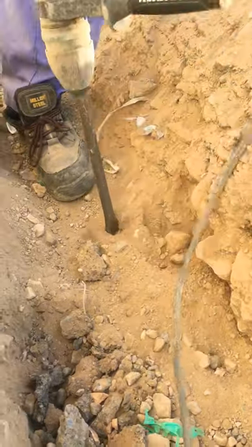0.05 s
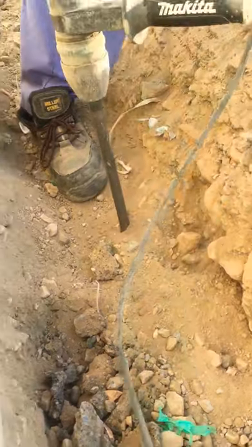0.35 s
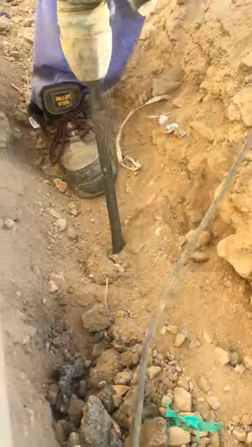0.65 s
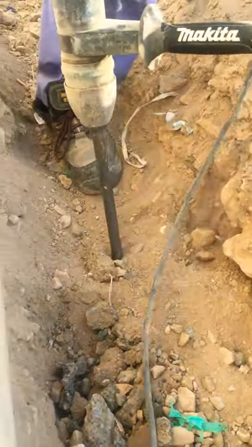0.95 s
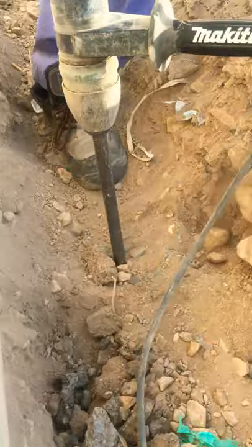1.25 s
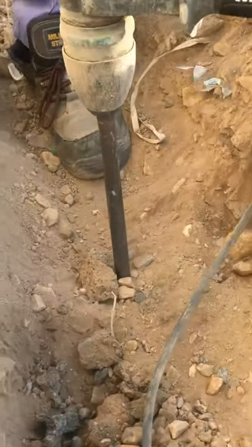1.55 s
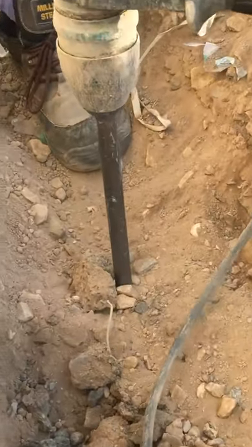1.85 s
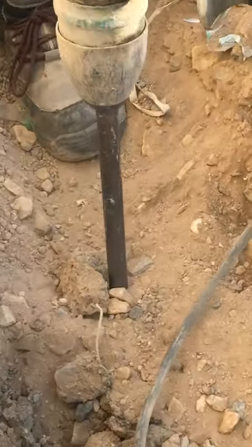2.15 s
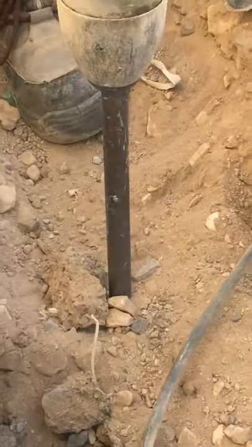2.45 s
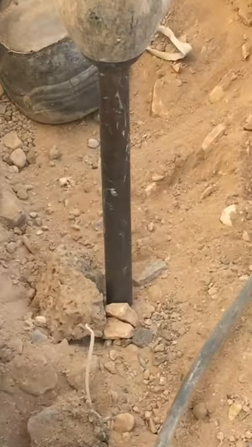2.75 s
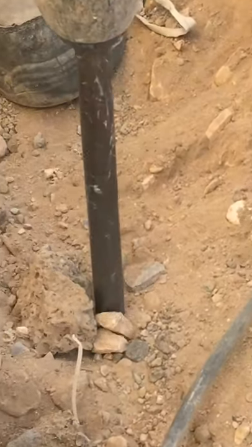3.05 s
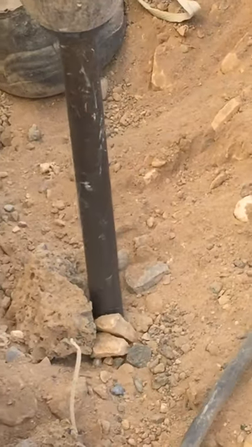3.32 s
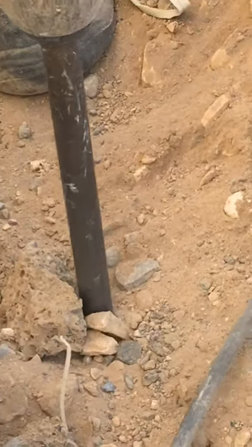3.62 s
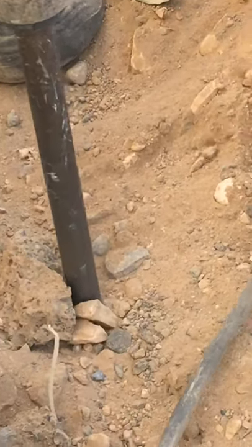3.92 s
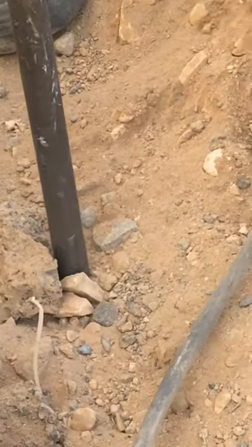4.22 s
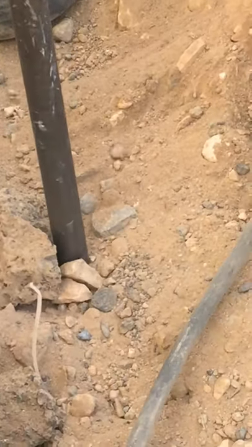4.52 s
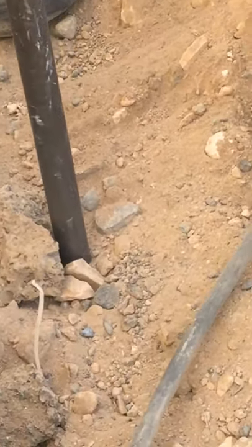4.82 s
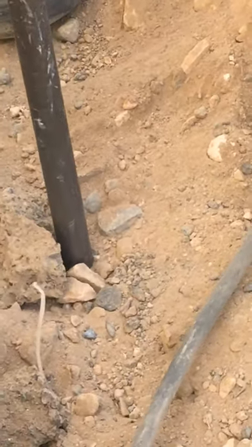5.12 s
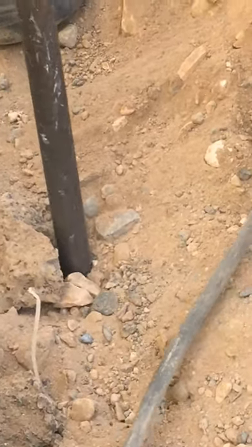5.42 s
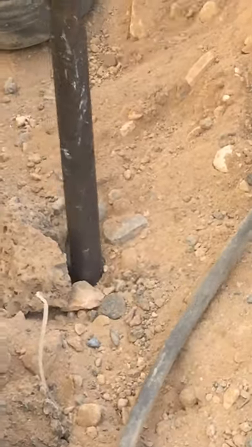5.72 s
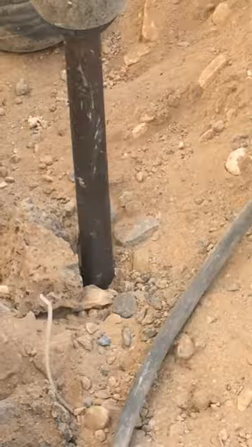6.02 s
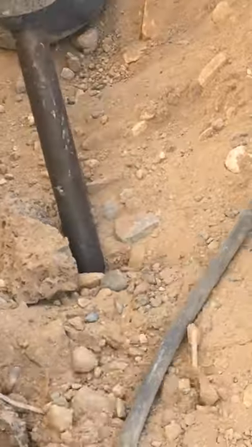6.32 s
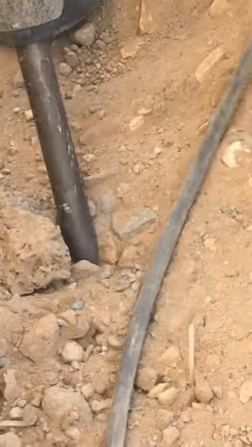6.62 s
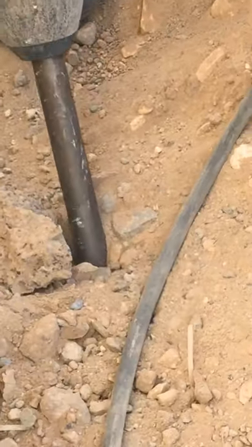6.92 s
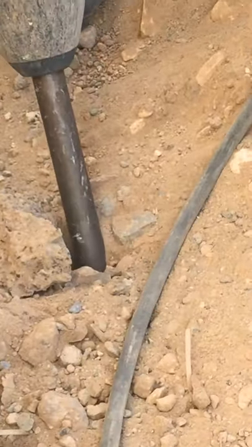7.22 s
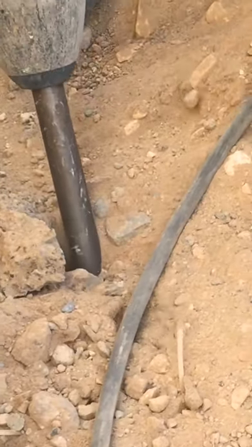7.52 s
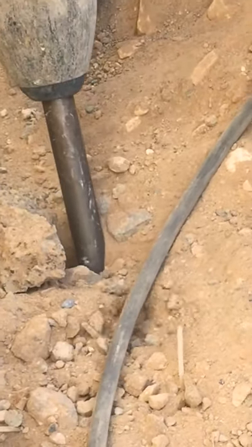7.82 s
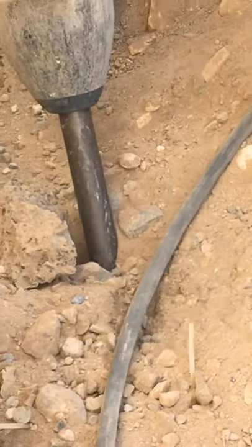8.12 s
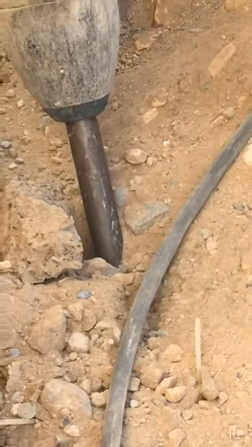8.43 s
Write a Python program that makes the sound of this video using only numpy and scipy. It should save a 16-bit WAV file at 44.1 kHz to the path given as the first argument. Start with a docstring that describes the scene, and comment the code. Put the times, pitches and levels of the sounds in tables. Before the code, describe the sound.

An electric demolition hammer rattles loosely against stony soil, runs free for a moment, then bites and pounds in a fast, steady stream. The steel bit rings, stone crunches and the ground thuds under whining gears and rushing fan air. Later the stone splits and the thudding briefly drops away before returning on firmer ground. Grit bumps the close microphone, and an engine drones faintly far off outdoors.

```python
"""An electric demolition hammer chisels stony soil in a trench, close to a phone; an engine drones far off.
The bit rattles loose, lifts off briefly, then bites at 1.1 s and takes 29 blows a second: steel rings,
stone crunches, the ground thuds. Gears whine under each compression stroke, the fan rushes, the housing
buzzes and flying grit knocks the phone. At 6 s the stone splits and the thud drops away;
from 6.5 s the bit settles on firmer ground below."""
import sys
import numpy as np
from scipy import signal
from scipy.fft import rfft, irfft
from scipy.io import wavfile
from scipy.ndimage import uniform_filter1d

SR = 44100
rng = np.random.default_rng(int(sys.argv[2]) if len(sys.argv) > 2 else 0)


def inscribe(sig):
    """Save sig as 16-bit PCM at rate SR to the path in sys.argv[1].

    A 1-D sig is mono; a 2-D sig holds one channel per row.
    Samples are clipped to [-1, 1] before scaling.
    """
    pcm = np.round(np.clip(np.atleast_2d(sig).T, -1, 1) * 32767)
    wavfile.write(sys.argv[1], SR, pcm.astype(np.int16))


N = 373086

BITE_S, BLOW_HZ = 1.1108, 29.275
SPLIT_S, SETTLE_S = 5.97, 6.51

# bit in its hole: time_s, play (0 wedged, 1 free)
BIT_PLAY = [(0, 0.88), (.95, 1), (1.2, .7), (1.8, 0.61), (2.3, 0.27), (3.2, 0.087), (5.8, .1), (6.2, .55),
            (6.6, 0.64), (7.3, .39), (8.4, 0.35)]
# housing's exposure to the phone: time_s, view (0 hidden, 1 open), third_harmonic_db
HOUSING_EXPOSURE = [(0, 1, -24), (.3, 0.88, -33), (.55, 0.83, -40), (.7, 0.89, -31), (.9, 0.79, -35),
                    (2, 0.83, -37), (3, 0.21, -38), (5.8, 0.25, -34.5), (6.3, 0.51, -34), (7, 0.32, -39),
                    (7.4, 0.54, -27), (8.4, 0.96, -25)]


def hammer():
    """The striker hits the bit, which rings and drives into the stone."""
    # uneven blows before the bite: start_s, force_db, play
    loose_blows = [(.129, -2.5, 0.1), (.143, -4.5, 0.88), (0.19, 5.5, 0.87), (.223, 3.5, 1),
                   (0.257, 1.5, 0.98), (.294, 0.5, 0.65), (.327, 0.5, .9), (.361, -0.5, 0.9),
                   (0.394, -1.5, 0.97), (.432, -6.5, 0.84), (0.482, -25, 0.9), (.528, -24, .5),
                   (.602, -22, 0.8), (.765, -16.5, 0.8), (.805, 2, 0.94), (.83, -9, 0.7), (.871, 4.5, 0.82),
                   (.906, 3.5, .9), (0.939, 2.5, .9), (.975, 3.5, .85), (1.008, 2, .8), (1.043, 2, 0.96),
                   (1.078, -.5, .75)]
    # stone cracking: time_s, extra_crunch_db
    cracks = [(1.55, 1), (1.9, 3.5), (2.25, 7.5), (3.17, 2.5), (4.33, 3.5), (4.561, 2), (4.83, 0.5),
              (6.08, 4), (6.41, 3), (6.82, 1), (7.82, 3)]
    loose_s, loose_db, loose_play = np.transpose(loose_blows)
    steady_s = np.arange(BITE_S, N / SR, 1 / BLOW_HZ)
    times = np.r_[loose_s, steady_s]
    play = np.r_[loose_play, read(BIT_PLAY, steady_s)[0]]
    late, bounce, scatter, spall, clink = rng.standard_normal((len(times), 5)).T
    # a free bit sits further forward: struck later, less evenly
    times += play * (0.0007 + 0.00013 * late) - 0.0003
    force_db = np.r_[loose_db, np.zeros_like(steady_s)] + (0.63 + 1.4 * play) * scatter
    change = 0.03 + 0.43 * play ** 2
    age = (np.arange(int(SR * 0.045)) - (times * SR % 1)[:, None]) / SR
    sunk_s = times - N / SR / 2  # soil muffles the sinking bit
    crack_db = sum(db * bump(times - at_s, width_s=0.021) for at_s, db in cracks)
    crunch_db = force_db - 25.5 - 0.43 * sunk_s + crack_db
    grit_db = force_db - 27 - 0.54 * sunk_s
    return (bit_ring(times, age, play, change, bounce, clink, force_db, crunch_db, grit_db)
            + backlash(times, age, change, -36 - 3 * play + 2.1 * late)
            + stone_knock(times, age, change, force_db - 33 - 2 * sunk_s - 4.8 * play)
            + crushing(times, age, play, crunch_db + 1.2 * spall, grit_db + 0.65 * spall)
            + ground_thud(times, age, force_db - 32.5 + 0.5 * spall))


def bit_ring(times, age, play, change, bounce, clink, force_db, crunch_db, grit_db):
    """Steel modes ring at the blow and again as the bit rebounds against its holder."""
    # bit modes: nominal_hz, gain_db, t60_s
    first_modes = [(6520, 2.5, .025), (6903, 18, 0.0075), (6973, 13, 0.02)]
    second_modes = [(13660, 0, .022), (14000, -9, .015)]
    bending_modes = [(4700, -10, .025), (5200, 0, .04), (5560, -8, .035), (5920, -6, .03)]
    clank_modes = [(680, -2, .03), (1720, -5, .025), (2920, 0, .04), (4720, -5, .035)]
    shank_modes = [(8600, -3.5, .02), (9350, -3, .024), (11150, -3, .022), (12150, -2, .025),
                   (15280, -1, .03)]
    # ring of the two length modes: time_s, first_db, second_db
    ring_levels = [(.2, -16.5, -26), (.93, -15.5, -18.5), (1.25, -24, -28), (1.65, -30, -30),
                   (2.05, -17, -26), (3.5, -18.5, -42), (4.5, -21, -36), (5, -19.5, -22), (5.95, -19, -26),
                   (6.15, -30.5, -46), (6.38, -30, -28), (6.5, -24.5, -13), (7.3, -34, -21),
                   (8.4, -30.5, -20.5)]
    rebound_age = age - (0.002 + play * (0.0038 + 0.001 * bounce))[:, None]
    contact = swell(age, rise_s=0.00054)
    recontact = (0.13 + 1.5 * play)[:, None] * swell(rebound_age, rise_s=0.00089)

    def steel(modes, level_db, detune, patchy_db, pull=1):
        struck = contact * ring(modes, age, change, detune, pull, patchy_db)
        rebound = recontact * ring(modes, rebound_age, change, detune, pull, patchy_db)
        return train(times, struck + rebound, level_db)

    first_db, second_db = read(ring_levels, times) + force_db
    first_pull, _ = contact_pull(times)
    grip = np.maximum(1 - play / 0.26, 0)[:, None]  # wedging stiffens the second mode
    second_pull = (13650 + 477 * grip) / 13700
    freed = swell(times - SETTLE_S, rise_s=0.66)  # the split stone lets the bit ring sideways
    bending_db = force_db - 42 + 11 * freed + 3 * clink
    return (steel(first_modes, first_db + 0.5, detune=0.0152, patchy_db=6.5, pull=first_pull)
            + steel(second_modes, second_db - 0.3, detune=0.0025, patchy_db=1.5, pull=second_pull)
            + steel(bending_modes, bending_db, detune=0.005, patchy_db=1)
            + steel(clank_modes, crunch_db - 20 + 18 * play + 1.5 * clink, detune=0.01, patchy_db=3)
            + steel(shank_modes, grit_db - 8 + 11 * play, detune=0.008, patchy_db=3))


def crushing(times, age, play, crunch_db, grit_db):
    """Stone crushes to crunch and fine grit as the bit advances; longer and less alike with play."""
    # spectra: freq_hz, density_db
    crunch_spectrum = [(200, -16), (450, -3), (760, 0), (1200, 0.5), (1750, 1), (2100, -0.5), (2500, 3.5),
                       (3200, -3.5), (4300, -2), (5400, -6), (7000, -6), (10000, -33.5)]
    grit_spectrum = [(3000, -30.5), (5500, 0.5), (7800, 3), (9400, 4), (10400, -4), (11300, 5), (12600, -2),
                     (14500, 7.5), (15400, -28), (16500, -20)]
    stroke_s = (0.0016 + 0.0062 * play)[:, None]
    crush = alike(0.35 + 0.33 * play, age.shape[1])
    crush *= burst(age, stroke_s, fall_s=0.0055, tail_db=-33, tail_s=0.011)
    dust = alike(0.23 + 0.13 * play, age.shape[1])
    dust *= burst(age, stroke_s, fall_s=0.0027, tail_db=-46, tail_s=0.005)
    crunch = train(times, crush, crunch_db + 2.5 - 1.9 * play)
    grit = train(times, dust, grit_db + 5 - 5 * play)
    return colour(crunch, crunch_spectrum) * crunch.std() + colour(grit, grit_spectrum) * grit.std()


def stone_knock(times, age, change, base_db):
    """The struck stone rings; louder until the bit seats and again on firm ground."""
    # stone modes: nominal_hz, gain_db, t60_s
    stone_modes = [(520, -5, .018), (765, 0, .03), (1040, -4, .022)]
    lost, firm = footing(times)
    on_surface = 1 - swell(times - BITE_S, rise_s=0.5)
    level_db = base_db + 3.5 * on_surface - 19 * lost + 11.5 * firm
    _, pull = contact_pull(times)
    stone_age = age - 0.0008
    knock = ring(stone_modes, stone_age, 0.29 * change, detune=0.0047, pull=pull, patchy_db=2.5)
    knock *= swell(stone_age, rise_s=0.0016)
    return bass_cut(train(times, knock, level_db), hz=189, order=2)


def ground_thud(times, age, base_db, delay_s=0.0042, soft_push_s=0.00062, firm_push_s=0.00035):
    """The ground takes each push just after the steel rings; firm ground shortens it."""
    # ground response: freq_hz, gain_db
    thud_spectrum = [(40, -19.5), (85, -10), (120, 4.5), (150, 1), (195, 4), (235, 0.5), (270, -7.5),
                     (335, 0.5), (430, -3), (600, -15), (1500, -39.5)]
    lost, firm = footing(times)
    wedging = spell(times - 1.475, rise_s=0.79, hold_s=0.21, release_s=0.13)
    push_s = (soft_push_s + (firm_push_s - soft_push_s) * firm)[:, None]
    level_db = base_db + 4.5 * wedging - 8.5 * lost + 5 * firm
    soil = train(times, bump(age - delay_s, push_s), level_db)
    return colour(soil, thud_spectrum) * soil.std()


def contact_pull(times):
    """The contact pulls the pitch of the first length mode and of the stone; returns ratios."""
    # contact tuning: time_s, first_mode_hz, stone_hz
    tuning = [(.9, 6610, 692), (1.5, 6800, 663), (2.5, 6990, 744), (3.2, 6710, 758), (3.9, 6880, 762),
              (4.4, 6740, 755), (4.9, 6760, 745), (5.8, 6720, 684), (8.4, 6710, 545)]
    first_hz, stone_hz = read(tuning, times)
    return first_hz[:, None] / 6850, stone_hz[:, None] / 765


def footing(times):
    """The stone splits: the bit loses its footing, then finds firm ground. Both 0 to 1."""
    lost = swell(times - SPLIT_S, rise_s=0.23) - swell(times - SETTLE_S, rise_s=0.44)
    firm = swell(times - SETTLE_S, rise_s=2.04)
    return lost, firm


def backlash(times, age, change, level_db, delay_s=0.0222):
    """Gear teeth knock together as the next compression stroke begins."""
    # gear modes: freq_hz, gain_db, t60_s
    gear_modes = [(1158, 6, 0.015), (1730, -5, 0.018), (2438, -6, 0.088)]
    clack = swell(age, rise_s=0.00054) * ring(gear_modes, age, change + 0.21, detune=0.011)
    return train(times + delay_s, clack, level_db)


def motor(t):
    """The piston's load pulses gears, fan and housing through each crank turn."""
    # gear load: turn_after_blow, level_db
    crank_load = [(0, 2.5), (.1, -22), (.24, 3), (.4, 2), (.56, -17.5), (.63, -13), (.68, -16), (.76, 7),
                  (.88, -2)]
    play, = read(BIT_PLAY, t)
    idle = play ** 4
    turns = (t - BITE_S) * BLOW_HZ
    driving_db = np.interp(turns, *np.transpose(crank_load), period=1)
    pumping_db = -1 - 5.8 * np.cos(4 * np.pi * turns)  # idle piston pumps air, once each way
    load_db = (1 - idle) * driving_db + idle * pumping_db
    hidden = 1 - read(HOUSING_EXPOSURE, t)[0]
    lifted = spell(t - 0.4, rise_s=0.054, hold_s=0.28, release_s=0.069)  # bit off, gears run light
    return (gear_whine(t, turns, play, idle, load_db, mesh_db=-29 - 4.5 * hidden - 7 * lifted)
            + fan_rush(-23 - 6.5 * hidden + 0.5 * lifted + (0.34 + 0.16 * idle) * load_db)
            + housing_buzz(t, -21.6 - 25 * hidden + 0.74 * load_db))


def gear_whine(t, turns, play, idle, load_db, mesh_db, teeth=41, swing_rad=1.58):
    """Meshing teeth whine, swelling on rebound and on compression."""
    # motor racing and sagging as the first blows catch: time_s, speed_change_pct
    speed_sag = [(0, 2), (.13, 1.5), (.26, -3), (.47, 2), (.62, -.5), (.85, .5), (1, -2.5), (1.2, 0)]
    # tooth load: turn_after_blow, level_db
    mesh_load = [(0, -3), (.07, -5), (.18, 4), (.3, -1), (.43, -7), (.54, -16), (.66, 6), (.76, 6),
                 (.9, -9)]
    # gearbox response: freq_hz, gain_db
    gearbox = [(900, -14.5), (1140, -8), (1235, -4.5), (1275, -2.5), (1400, -16), (1800, -15)]
    # mesh overtones: multiple, gain_db
    overtones = [(2, -6), (4, -5.5), (5, -18.5), (6, -11.5)]
    slip_turns = np.cumsum(read(speed_sag, t)[0] / 100) * BLOW_HZ / SR
    phase = 2 * np.pi * teeth * (turns + slip_turns) + (0.055 + 0.24 * play) * walk(60)
    # crank speed varies within a turn: sidebands
    swing = swing_rad * (1 - idle) * np.sin(2 * np.pi * (turns - 0.6))
    sway = (1 - idle) * np.sin(2 * np.pi * (turns - 0.75))
    press_db = (1 - idle) * np.interp(turns, *np.transpose(mesh_load), period=1) + idle * load_db
    fundamental = undb(press_db) * np.sin(phase + swing + 0.24 * walk(200))
    whine = undb(mesh_db) * colour(fundamental, gearbox)
    third_db = read(HOUSING_EXPOSURE, t)[1] + (0.63 + 0.94 * idle) * load_db + 2.5
    whine += undb(third_db) * np.sin(3 * phase + 1.3 * sway + 0.53 * walk(250))
    for multiple, gain_db in overtones:
        overtone = unit(np.sin(multiple * phase + 1.8 * sway + 0.5 * walk(300)))
        whine += undb(mesh_db + gain_db + 0.5 * load_db) * overtone
    return whine


def fan_rush(level_db):
    """Fan air: broad noise with a slight flutter."""
    # air noise: freq_hz, density_db
    fan_spectrum = [(100, -13), (280, -15), (500, -7), (1000, -1), (1700, -.5), (2500, 0), (2750, -6),
                    (3200, -6.5), (4200, -9), (5500, -10.5), (7300, -12), (8500, -22), (10400, -29),
                    (12200, -28), (16000, -33)]
    return undb(level_db + 1.16 * walk(160)) * colour(rng.standard_normal(N), fan_spectrum)


def housing_buzz(t, base_db):
    """The housing resonates, more when the motor races unloaded."""
    # housing response: freq_hz, gain_db
    housing_spectrum = [(900, -20.5), (1380, -19), (1480, 1), (1560, -8), (1680, -16.5), (1900, -20),
                        (2300, -40), (2500, -21), (2750, -24), (5000, -34.5)]
    # motor racing: time_s, extra_db
    racing = [(.04, 2), (.7, 2.5)]
    racing_db = sum(db * bump(t - at_s, width_s=0.09) for at_s, db in racing)
    return undb(base_db + racing_db) * colour(rng.standard_normal(N), housing_spectrum)


def grit_knocks(body_hz=75, top_hz=650, cut_hz=48):
    """Flying crumbs bump the phone: dull pulses that swing out through the microphone's bass cut."""
    # impacts: start_s, peak_db
    impacts = [(0.153, -14), (.945, -8), (0.966, -15), (2.27, -18), (2.443, -11), (3.03, -11), (3.102, -17),
               (4.06, -21), (4.13, -18), (4.191, -16), (5.009, -0.5), (6.685, -4.5), (6.855, -7.5),
               (6.892, -12), (6.927, -20), (6.957, -11), (8.119, -19), (8.291, -19)]
    times, peak_db = np.transpose(impacts)
    pulse = signal.unit_impulse(SR // 10)
    pulse = signal.sosfilt(signal.butter(1, body_hz, fs=SR, output="sos"), pulse)
    pulse = signal.sosfilt(signal.butter(2, top_hz, fs=SR, output="sos"), pulse)
    pulse = bass_cut(pulse, cut_hz, order=3)
    return lay(times, undb(peak_db)[:, None] * pulse / np.abs(pulse).max())


def distant_engine(t):
    """An engine drones on two harmonics of wavering level."""
    # drone: time_s, pitch_hz, relative_db
    drone_curve = [(0, 66.1, -26), (.45, 82.8, -25.5), (.68, 83.1, -22), (1.3, 78.5, -32.5),
                   (2.8, 79.7, -27), (3.5, 80, -38), (4.6, 86.8, -40.5), (7, 92.4, -41), (8.4, 99.6, -42)]
    pitch_hz, relative_db = read(drone_curve, t)
    phase = 2 * np.pi * np.cumsum(pitch_hz) / SR
    drone = unit(np.sin(phase) + undb(-12 + 2 * walk(2.4)) * np.sin(2 * phase))
    return undb(relative_db - 4.5 + 3.2 * walk(10)) * drone


def outdoor_rumble():
    """Low noise of drifting level."""
    # rumble: freq_hz, density_db
    rumble_spectrum = [(20, -33), (45, -14), (70, 1), (150, -5.5), (260, -16), (600, -23.5)]
    return undb(-37 + 2 * walk(5)) * colour(rng.standard_normal(N), rumble_spectrum)


def ring(modes, age, change, detune, pull=1, patchy_db=2):
    """Modes struck at age 0; pitch and strength wander from blow to blow."""
    total, age = 0, np.maximum(age, 0)
    for hz, db, t60_s in modes:
        pitch, strength = alike(change, size=2).T[:, :, None]
        pulled_hz = hz * pull * (1 + detune * pitch)
        tone = np.sin(2 * np.pi * pulled_hz * age + rng.uniform(0, 2 * np.pi))
        total += undb(db + patchy_db * strength - 60 * age / t60_s) * tone
    return total


def alike(change, size):
    """One noise row per blow, renewed by the share `change`: the contact alters by degrees."""
    rows = rng.standard_normal((len(change), size))
    for k in range(1, len(rows)):
        rows[k] = np.sqrt(1 - change[k]) * rows[k - 1] + np.sqrt(change[k]) * rows[k]
    return rows


def burst(age, rise_s, fall_s, tail_db, tail_s):
    """Linear rise, quick decay, faint tail from the trench walls."""
    after_s = np.maximum(age - rise_s, 0)
    decay = np.exp(-after_s / fall_s) + undb(tail_db) * np.exp(-after_s / tail_s)
    return np.clip(age / rise_s, 0, 1) * decay


def train(times, sounds, rms_db):
    """A run of blows, each scaled to rms_db over one crank turn."""
    gain = undb(rms_db) * np.sqrt(SR / BLOW_HZ / np.sum(sounds ** 2, axis=1))
    return lay(times, sounds * gain[:, None])


def lay(times, sounds):
    track = np.zeros(N)
    for start, sound in zip((times * SR).astype(int), sounds):
        track[start:start + len(sound)] += sound[:max(N - start, 0)]
    return track


def colour(x, spectrum, size=2048):
    """Minimum-phase filter; output rms 1."""
    hz, db = np.transpose(spectrum)
    bin_hz = np.fft.rfftfreq(size, 1 / SR)
    log_gain = np.log(undb(np.interp(np.log(bin_hz + 1), np.log(hz), db)))
    cepstrum = irfft(log_gain) * (1 + np.sign(np.fft.fftfreq(size)))
    impulse = irfft(np.exp(rfft(cepstrum)))
    return unit(signal.oaconvolve(x, impulse)[:N])


def bass_cut(x, hz, order):
    return signal.sosfilt(signal.butter(order, hz, "high", fs=SR, output="sos"), x)


def walk(rate_hz):
    """Smooth random drift, rms 1."""
    hold = int(SR / rate_hz)
    steps = np.repeat(rng.standard_normal(N // hold + 1), hold)
    return unit(uniform_filter1d(steps, hold)[:N])


def swell(age, rise_s):
    """Smooth step, 0 to 1."""
    x = np.clip(age / rise_s, 0, 1)
    return x * x * (3 - 2 * x)


def spell(age, rise_s, hold_s, release_s):
    return swell(age, rise_s) - swell(age - rise_s - hold_s, release_s)


def bump(age, width_s):
    return np.exp(-(age / width_s) ** 2)


def read(table, times):
    """Table columns interpolated at the given times."""
    time_s, *columns = np.transpose(table)
    return [np.interp(times, time_s, column) for column in columns]


def undb(db):
    return 10 ** (np.asarray(db) / 20)


def unit(x):
    return x / np.sqrt(np.mean(x ** 2))


def scene():
    t = np.arange(N) / SR
    return (hammer() + motor(t) + grit_knocks() + distant_engine(t) + outdoor_rumble())[None]


def record(dry, top_hz=15800):
    """The hardest blows overload the phone, which also cuts the deep bass and the top."""
    clipped = dry / (1 + dry ** 8) ** (1 / 8)
    top_cut = signal.ellip(8, 0.2, 60, top_hz, fs=SR, output="sos")
    return signal.sosfilt(top_cut, bass_cut(clipped, hz=32, order=4))


dry = scene()
out = record(dry)
inscribe(out)
```